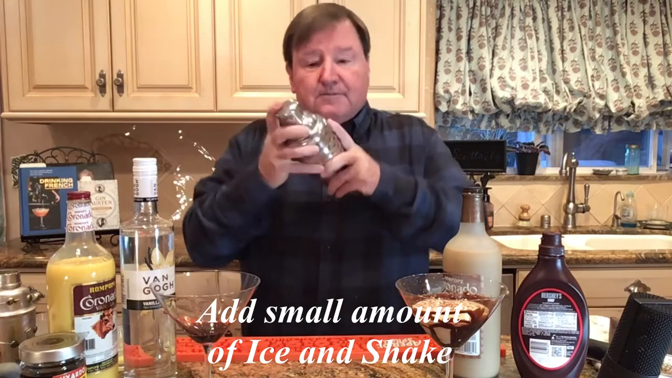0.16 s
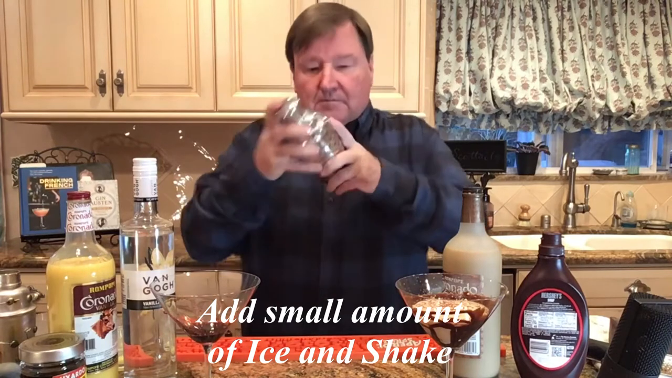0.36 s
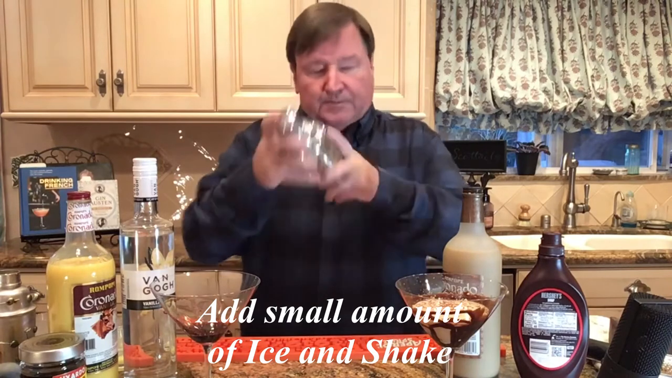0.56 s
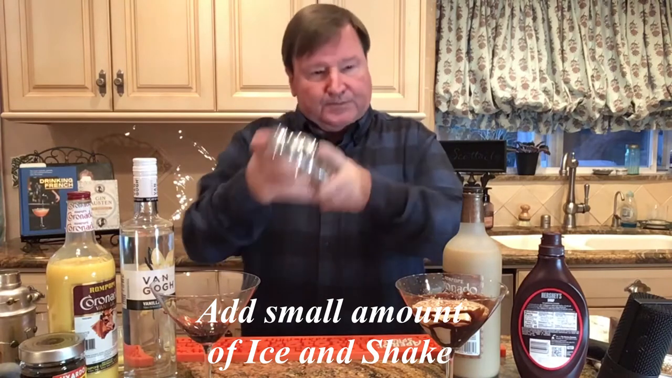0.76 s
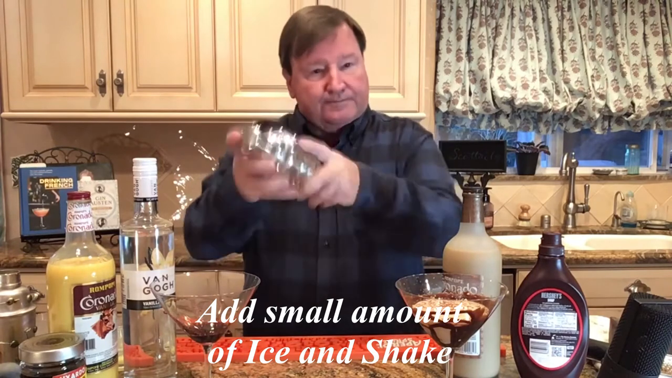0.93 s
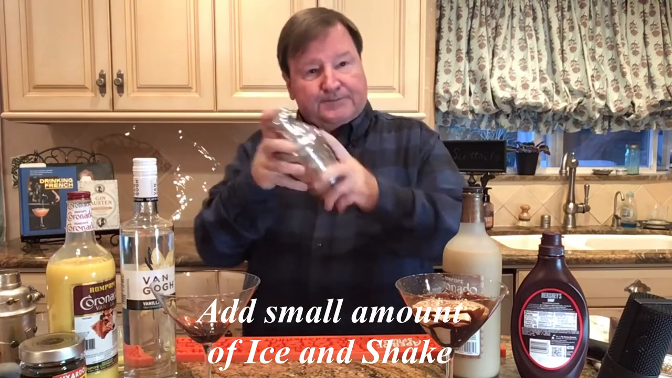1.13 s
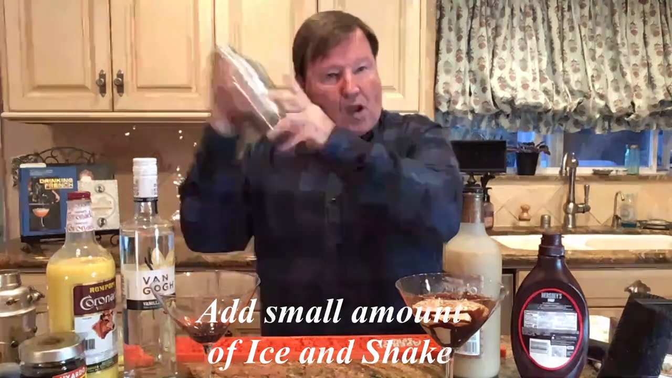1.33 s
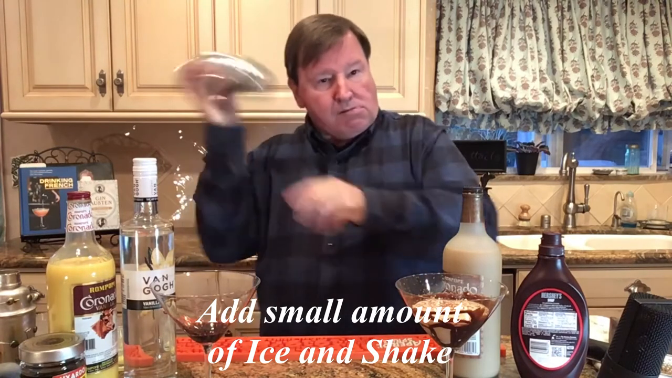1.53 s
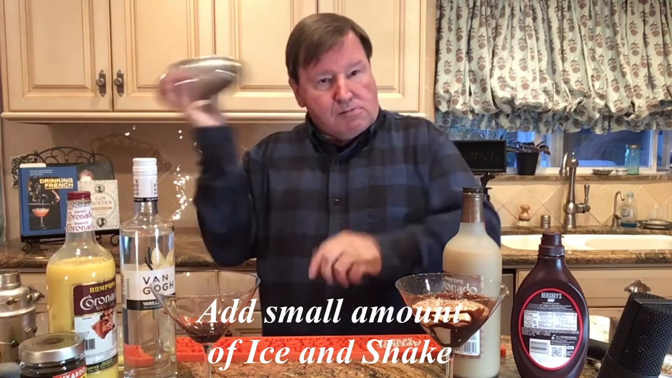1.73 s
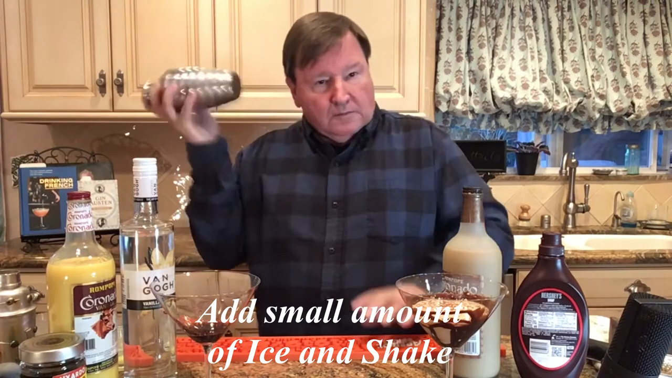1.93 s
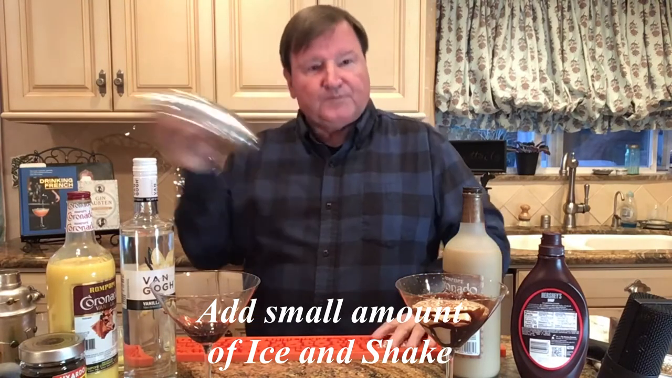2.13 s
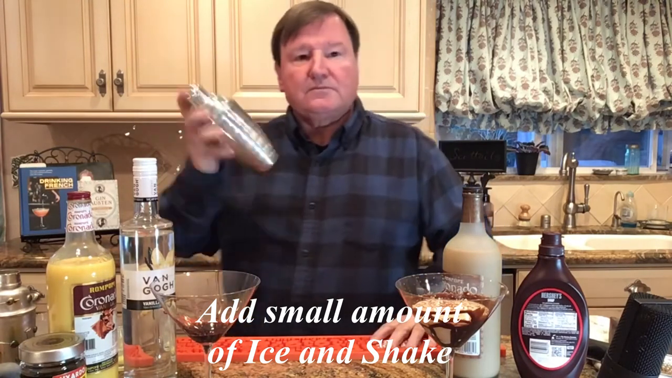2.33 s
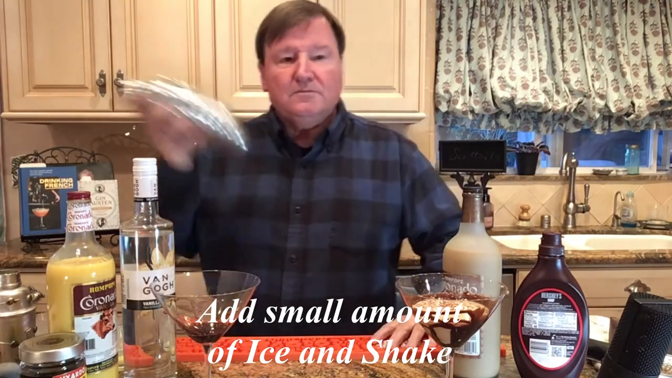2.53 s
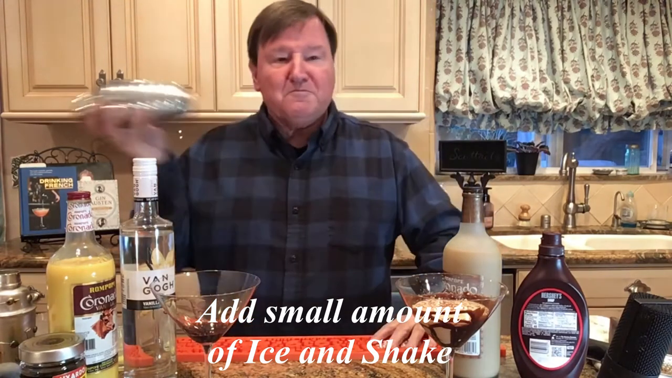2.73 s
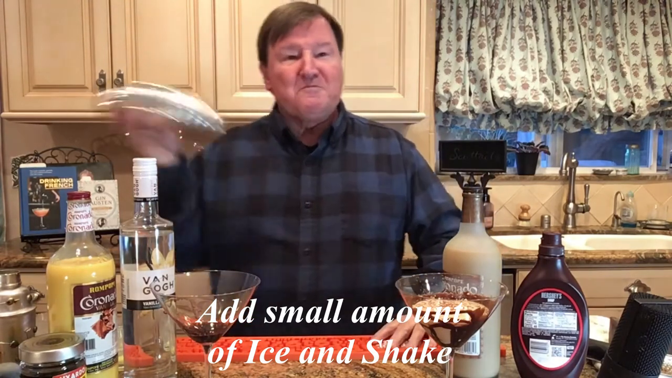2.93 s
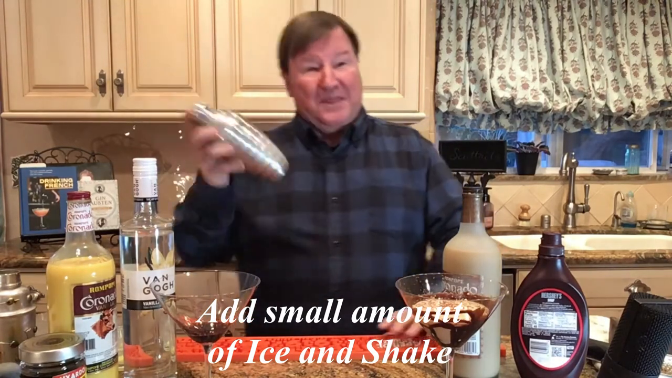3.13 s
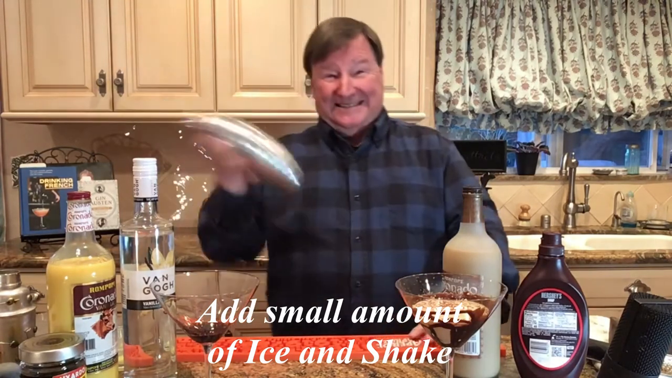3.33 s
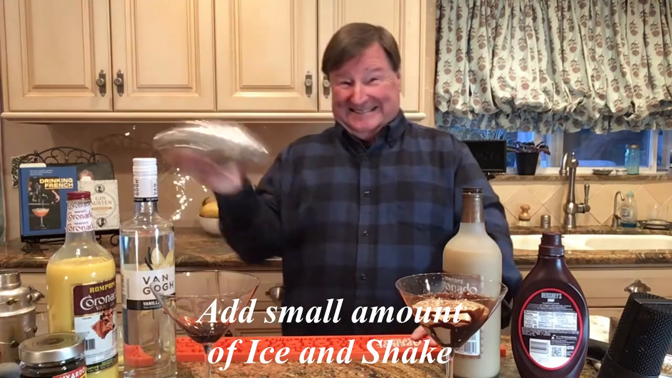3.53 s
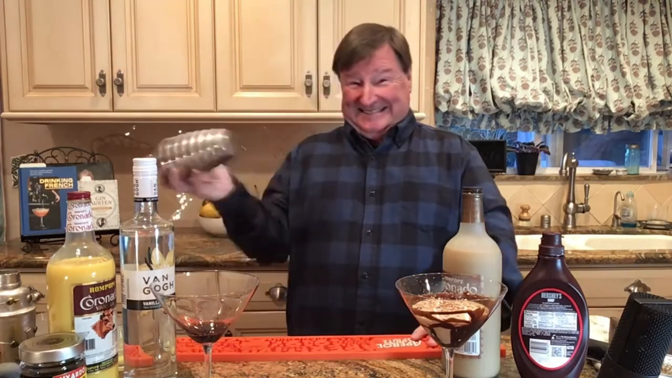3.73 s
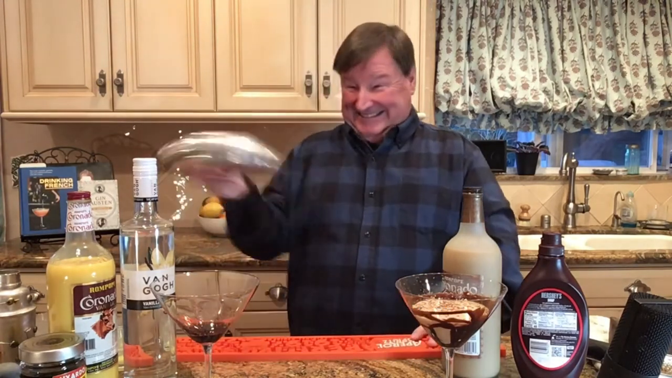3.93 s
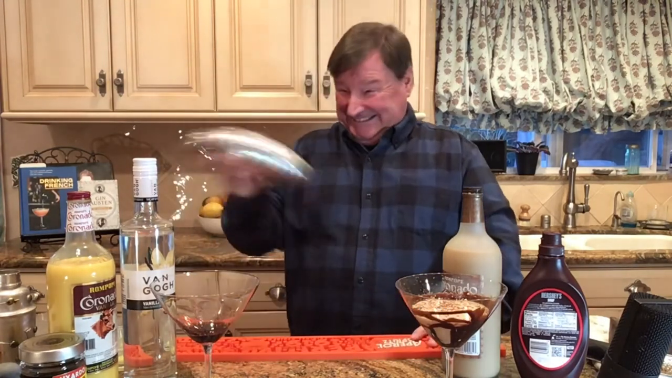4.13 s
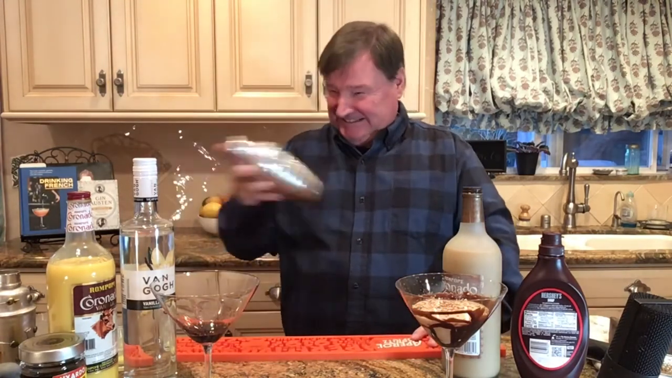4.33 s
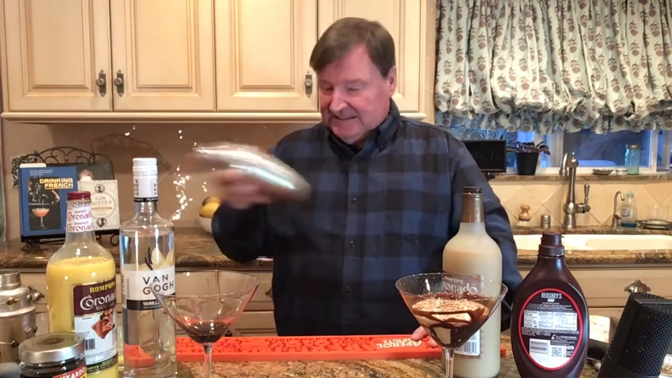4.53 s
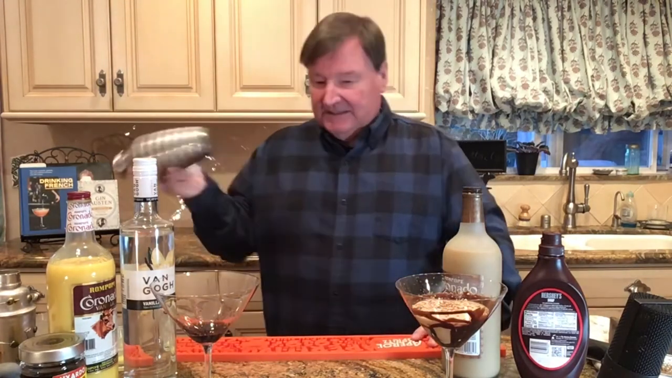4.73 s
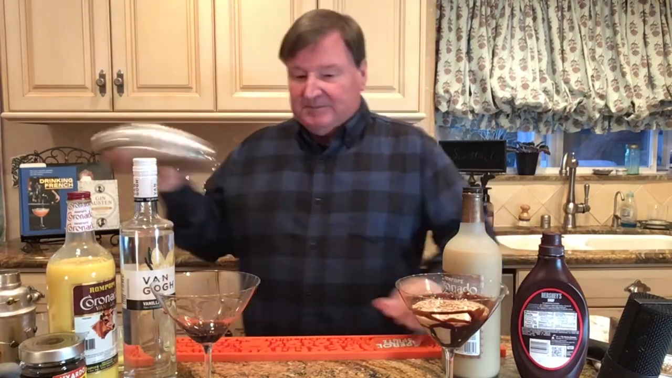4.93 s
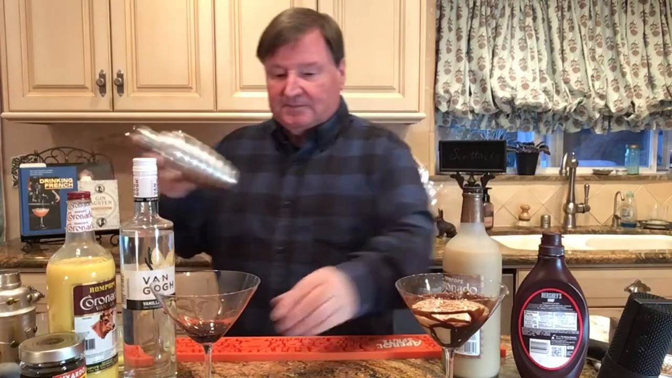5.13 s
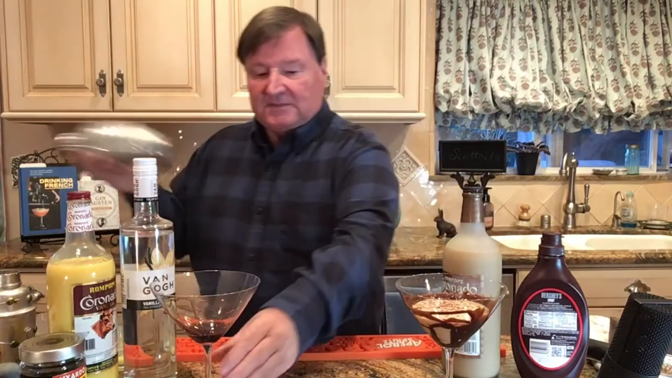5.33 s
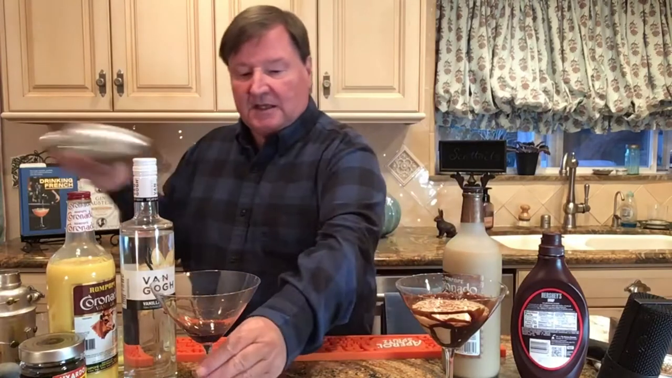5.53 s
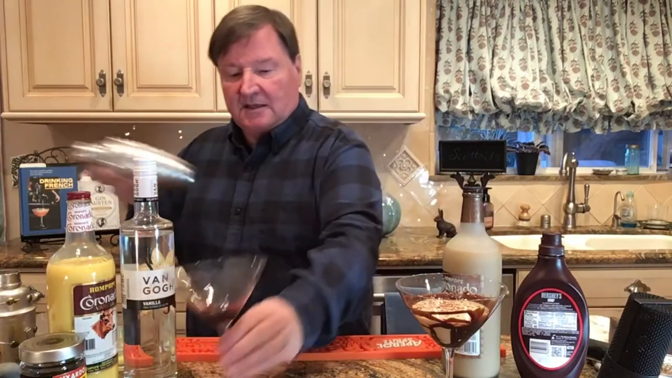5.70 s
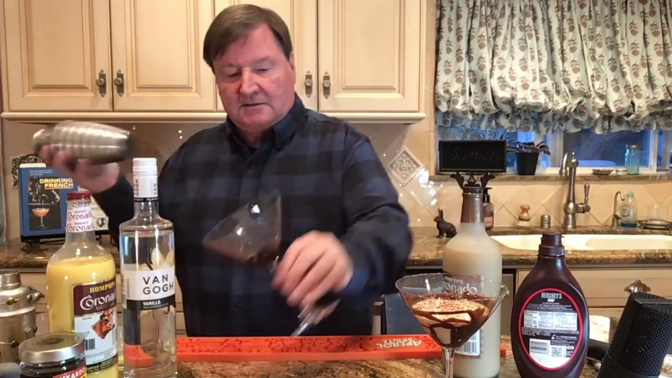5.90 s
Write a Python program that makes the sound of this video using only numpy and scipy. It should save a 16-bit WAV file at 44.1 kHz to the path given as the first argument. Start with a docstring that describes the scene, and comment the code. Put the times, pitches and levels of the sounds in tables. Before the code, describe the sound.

Vigorous shaking of ice and drink in a steel tin: fast, crunchy, dull-ringing rattles with one short gap early on, close in a home kitchen.

```python
"""Ice knocks hard on steel while ice and a creamy drink are shaken in a cocktail shaker in a kitchen.
Around each end of a stroke cubes knock (short thud, clack and tick), small chips rattle (filtered random
clicks) and the liquid slaps (duller clicks and low thuds), with a short pause to change grip.
The wet steel rings briefly (decaying, wavering tones) and two hands thump softly (a low decaying tone).
Cupboards and counter add a short bright echo (decaying noise) over room air and a faint mains hum."""
import sys
import numpy as np
from scipy import signal
from scipy.fft import rfft, irfft
from scipy.io import wavfile
from scipy.ndimage import uniform_filter1d

SR = 44100
rng = np.random.default_rng(int(sys.argv[2]) if len(sys.argv) > 2 else 0)


def store_wav(level_fs):
    """Save 16-bit WAV to argv[1]."""
    pcm = np.round(np.clip(np.atleast_2d(level_fs), -1, 1) * 32767)
    wavfile.write(sys.argv[1], SR, pcm.T.astype(np.int16))


N = 267422
TIME = np.arange(N) / SR  # seconds

# single knocks of a cube on the tin, from hard blows to faint ticks; levels are before the trims in cubes():
# start_s, hollow_thud_db, clack_db, bright_tick_db, clack_pitch_hz
KNOCKS = [(0.0285, -24, -18.5, -18, 2850), (.0848, -27.5, -23.5, -23, 2750), (0.1173, -45, -36, -16, 3850),
          (0.1461, -29, -19, -18, 2780), (.1605, -27, -21, -15, 3000), (.1686, -33, -12.5, -23, 3020),
          (.182, -24, -19, -18, 3830), (.196, -21, -17.5, -33, 2720), (0.3069, -13.5, -11, -19.5, 2600),
          (0.3762, -20, -18, -12, 2900), (0.3858, -20, -15, -14, 2750), (.419, -21, -12.5, -21, 2810),
          (.448, -36, -26, -20, 2900), (0.5, -23, -30, -18, 2940), (0.5058, -30, -23, -16.5, 2700),
          (.517, -18, -27, -19, 3050), (0.5415, -40, -12.5, -35, 3040), (.6046, -22, -27, -23, 3340),
          (.6212, -23, -18, -20, 2960), (.646, -18.5, -18.5, -23, 3150), (0.7195, -28, -23, -21, 3470),
          (0.7353, -18, -27, -30, 2450), (0.7474, -18.5, -22, -29, 2370), (0.7763, -23, -13.5, -23, 2700),
          (.793, -24, -16, -31, 3080), (.807, -43, -9.5, -37, 3050), (0.8497, -26, -14, -8, 4020),
          (.8564, -21, -15, -19, 3400), (.907, -26, -34, -19, 3580), (0.9313, -20, -14, -18, 3200),
          (.971, -17.5, -14, -25, 2400), (0.9934, -34, -14, -25, 2260), (1.041, -25, -14, -24, 2620),
          (1.0547, -43, -15.5, -16, 3170), (1.0734, -27, -18.5, -19, 3450), (1.1469, -22, -23, -21, 2680),
          (1.1792, -20, -18, -39, 2470), (1.185, -25, -24, -28, 2580), (1.22, -27, -19, -33, 4460),
          (1.269, -22, -45, -28, 2440), (1.3751, -39, -33.5, -38, 2500), (1.4548, -37, -31.5, -39, 2580),
          (1.5568, -47, -26, -23, 3600), (1.59, -40, -19.5, -23, 4000), (1.6566, -29, -15.5, -22, 3500),
          (1.674, -11, -14, -20, 2110), (1.8117, -28, -10, -22, 2870), (1.9054, -45, -25, -22, 3000),
          (1.9246, -30, -21, -24, 2980), (1.934, -19, -27, -19, 3560), (1.9928, -27, -18.5, -21, 2470),
          (2.0125, -33, -12.5, -27, 3600), (2.0466, -39, -12, -25, 2960), (2.1453, -37, -20, -18, 3000),
          (2.1587, -15, -13, -24, 3580), (2.1778, -20, -18, -20.5, 2550), (2.303, -27, -21, -38, 3650),
          (2.309, -22, -20, -27, 3030), (2.3832, -40, -25, -23, 2900), (2.4238, -38, -18, -24, 3040),
          (2.439, -38, -17, -30, 2980), (2.4432, -23, -19, -26, 2270), (2.515, -42, -12.5, -30, 3120),
          (2.572, -31, -16.5, -23, 3660), (2.6678, -30, -22, -16.5, 4400), (2.71, -19.5, -31, -22, 2750),
          (2.8162, -27, -19, -26, 3240), (2.8221, -38, -9, -37, 3070), (2.85, -36, -13, -22, 4480),
          (2.914, -27, -20, -20, 3580), (2.9394, -26, -10.5, -33, 3150), (2.9782, -26, -16, -32, 2940),
          (3.0895, -32, -17.5, -30, 3220), (3.19, -25, -21, -21, 3080), (3.2967, -41, -28.5, -43, 3040),
          (3.342, -54, -28, -27, 3080), (3.3888, -22, -11, -29, 3000), (3.453, -21.5, -18, -24, 3000),
          (3.4806, -37, -9.5, -18, 3260), (3.4976, -17, -13.5, -30, 3100), (3.5859, -22, -21, -25, 3070),
          (3.628, -24, -14.5, -25, 2980), (3.7082, -39, -18, -20, 3480), (3.737, -18, -21, -30, 3020),
          (3.861, -40, -15.5, -32, 3130), (3.8855, -28, -18, -35, 3530), (3.8934, -38, -24, -16, 3250),
          (3.9478, -20, -22, -20, 3170), (3.9777, -21.5, -21, -33, 3150), (4.0625, -29, -19, -20.5, 3050),
          (4.0741, -24, -21, -35, 2920), (4.1045, -47, -14, -33, 3100), (4.1432, -34, -25, -18, 3230),
          (4.1605, -28, -13, -33, 3060), (4.1834, -20, -42, -42, 2900), (4.198, -19, -18, -19, 3220),
          (4.2528, -25, -20.5, -22, 3240), (4.31, -46, -7.5, -20, 3200), (4.3261, -42, -12, -29, 2910),
          (4.343, -27, -12.5, -34, 3120), (4.383, -31, -18, -25, 3030), (4.4034, -19, -27, -24, 3000),
          (4.4282, -19, -29, -22, 2750), (4.5142, -25, -14.5, -22.5, 3000), (4.5283, -35, -15, -33, 2960),
          (4.551, -28, -26, -31, 3150), (4.5683, -32, -10.5, -38, 3800), (4.5756, -31, -10, -21, 3240),
          (4.6082, -26, -22, -15, 4050), (4.6596, -15, -36, -19.5, 2900), (4.794, -35, -19.5, -24.5, 3040),
          (4.8334, -32, -18, -30, 3340), (4.8587, -44, -14.5, -37, 3330), (4.8796, -39, -14.5, -26, 3150),
          (4.9133, -38, -21.5, -24, 2550), (5.088, -35, -31, -42, 3100), (5.1162, -41, -16, -39, 3320),
          (5.2044, -43, -21, -23, 3180), (5.3917, -44, -13.5, -23, 3130), (5.4868, -26, -24, -27.5, 3040),
          (5.643, -30, -30, -40, 2850), (5.698, -39, -20.5, -39, 3970)]
# tone colour of the hollow thud: pitch_hz, level_db
THUD_COLOUR = [(60, -36), (160, -21.5), (350, -11), (600, -4.5), (1000, -4), (1400, 9.5), (1900, 4.5),
               (2600, 1.5), (5000, -61)]
# tone colour of the bright tick: pitch_hz, level_db
TICK_COLOUR = [(2500, -18), (4200, 2), (5200, 3.5), (6500, -1), (8000, 2.5), (10500, 2.5), (13000, -0.5),
               (16000, -4)]


def cubes(thud_db=-2, clack_db=-2, tick_db=-1, clack_s=0.0011, thud_s=0.002, tick_s=0.0011,
          crunch_s=0.00046, crunch_db=-9, radiate_hz=240):
    """Each cube crunches on the steel for a moment and rings the hand-damped wall and the cavity."""
    out = np.zeros(N)
    t = TIME[:1024]
    span = 0.0035 * SR  # a part's level is its energy spread over 3.5 ms
    trims = (thud_db, clack_db, tick_db)
    for start_s, *levels, pitch_hz in KNOCKS + tumble():
        crunch, body, crack = rng.standard_normal((3, len(t)))
        # the contact is one click plus a very short crunch
        contact = undb(crunch_db) * crunch * np.exp(-t / crunch_s)
        contact[0] += 1
        wall_ring = np.exp(-t / clack_s) * np.cos(2 * np.pi * pitch_hz * t)
        clack = signal.fftconvolve(contact, wall_ring)[:len(t)]
        thud = colour(body * np.exp(-t / thud_s), THUD_COLOUR)
        tick = colour(crack * np.exp(-t / tick_s), TICK_COLOUR)
        for part, db, trim in zip((thud, clack, tick), levels, trims):
            gain = undb(db + trim) * np.sqrt(span / np.sum(part ** 2))
            add(out, start_s, part * gain)
    # a small tin radiates almost no bass
    return signal.sosfilt(signal.butter(2, radiate_hz, "highpass", fs=SR, output="sos"), out)


# more cubes tumble in around each crest: timing, level against the stroke, and random scatter
TUMBLE_LEAD_S, TUMBLE_SPREAD_S, TUMBLE_SCATTER_DB = 0.004, 0.034, 3
TUMBLE_THUD_DB, TUMBLE_CLACK_DB, TUMBLE_TICK_DB = -15, -5, -6
TUMBLE_HZ, TUMBLE_OCTAVES = 3140, 0.22


def tumble(count=3):
    """A few more cubes land one after another, harder in a harder stroke; rows as in KNOCKS."""
    rows = []
    for crest_s, db, bright_db, _ in STROKES:
        base = db + np.array([TUMBLE_THUD_DB, TUMBLE_CLACK_DB, TUMBLE_TICK_DB + bright_db])
        for k in range(count):
            turn = 2 * (k + rng.random()) / count - 1  # place in the stroke, from -1 to 1
            chance = rng.uniform(-1.07, 1, 4)
            levels = base + TUMBLE_SCATTER_DB * chance[1:]
            start_s = crest_s - TUMBLE_LEAD_S + TUMBLE_SPREAD_S * turn
            pitch_hz = TUMBLE_HZ * 2 ** (TUMBLE_OCTAVES * chance[0])
            rows.append((start_s, *levels, pitch_hz))
    return rows


# the load arriving at one end of the tin, also used by tumble() and liquid(); levels before trims:
# crest_s, rattle_db, brightness_db (treble against the rattle), liquid_db
STROKES = [(0.034, -22, -1.5, -46.5), (.163, -17.5, 1, -33.5), (0.306, -21, -4.5, -38),
           (.396, -17, -3.5, -35.5), (0.518, -15, -3.5, -33), (.628, -18, -1.5, -32.5),
           (0.728, -19.5, -6.5, -37.5), (.826, -17.5, -2.5, -34), (.965, -16.5, -6, -30.5),
           (1.047, -17.5, -2, -40), (1.153, -20, -3.5, -40), (1.236, -27, -12, -42), (1.33, -49, -4, -46),
           (1.461, -40.5, -5, -51), (1.605, -19.5, -3, -42), (1.678, -19, -3.5, -33.5),
           (1.816, -20, -3, -40), (1.933, -19.5, -4, -32), (2.042, -17, -8, -38), (2.163, -20.5, -3, -28),
           (2.324, -18, -5.5, -34), (2.439, -17, -4, -33.5), (2.592, -20.5, -6, -37.5),
           (2.677, -19.5, -1, -30.5), (2.84, -21.5, -7, -37), (2.946, -18.5, -4.5, -28.5),
           (3.106, -19, -5.5, -36.5), (3.214, -19.5, -5, -31.5), (3.405, -23.5, -4, -39.5),
           (3.49, -20.5, -7, -31), (3.625, -19.5, -8, -37), (3.705, -18, -4, -29), (3.854, -17, -5.5, -35),
           (3.948, -19.5, -4, -32), (4.1, -20, -9, -35), (4.17, -21, -6, -34.5), (4.325, -20, -5, -38),
           (4.405, -18, -5.5, -32.5), (4.573, -21.5, -6, -40), (4.651, -18.5, -6, -30),
           (4.861, -21, -3.5, -38), (4.953, -24.5, -5, -32.5), (5.129, -23, -6.5, -37),
           (5.238, -20, -7.5, -32), (5.418, -22, -3, -38), (5.509, -21, -7, -30.5),
           (5.725, -21.5, -6, -35.5), (5.867, -20, -5, -36), (6.026, -29.5, -7, -42.5)]
# tone colour of the small chips: pitch_hz, level_db
CHIPS_COLOUR = [(300, -38.5), (900, -29), (1350, -6), (2100, -6.5), (2650, -5.5), (3100, 2.5), (3600, -5.5),
                (4500, -5), (6300, -13.5), (8000, -7.5), (10500, -10.5), (13000, -14), (15500, -23.5)]
# every load of ice piles up and settles alike: times over 20 dB
ICE_RISE_S, ICE_FALL_S = 0.07, 0.12


def chips(level_db=-4.5, rate=720, scatter_db=3.5, bright_db=2):
    """Small ice rattles through every stroke; each stroke has its own brightness."""
    hail = clatter(rate, scatter_db, variety_db=10.5, even_s=0.043)
    rattle = unit(colour(hail, CHIPS_COLOUR))
    treble = signal.sosfiltfilt(signal.butter(2, 5200, "highpass", fs=SR, output="sos"), rattle)
    times, db, bright, _ = np.transpose(STROKES)
    body = surges(times, db, ICE_RISE_S, ICE_FALL_S)
    sparkle = surges(times, db + bright + bright_db, ICE_RISE_S, ICE_FALL_S)
    return undb(level_db) * ((rattle - treble) * body + treble * sparkle)


# tone colour of the splashing drink, also used by hammers(): pitch_hz, level_db
LIQUID_COLOUR = [(90, -20), (190, -10.5), (330, -6.5), (500, -0.5), (800, 1), (1150, 5), (1500, -4),
                 (2000, 1), (3000, 1.5), (6000, -22.5)]
# every load of liquid piles up and settles alike: times over 20 dB
LIQUID_RISE_S, LIQUID_FALL_S = 0.066, 0.11
# heavy splashes land just after the ice, light ones slightly before: shift of a middling one, and per dB
LIQUID_SHIFT_S, SHIFT_S_PER_DB = 0.0071, 0.002


def liquid(rate=450, scatter_db=5):
    """The drink slaps the end of the tin in a burst of dull splashes, later when it is heavier."""
    hail = clatter(rate, scatter_db, variety_db=11, even_s=0.03)
    splashes = unit(colour(hail, LIQUID_COLOUR))
    times, _, _, db = np.transpose(STROKES)
    shift = LIQUID_SHIFT_S + SHIFT_S_PER_DB * (db - np.median(db))
    return splashes * surges(times + shift, db, LIQUID_RISE_S, LIQUID_FALL_S)


# the whole slug of drink hammering into the end of the tin; level is the thud's peak before the bass cut:
# start_s, level_db, pitch_hz
HAMMERS = [(.85, -20, 594), (1.27, -20, 850), (1.588, -19.5, 554), (1.656, -24, 850), (1.808, -24, 510),
           (2.047, -16.5, 563), (2.16, -9, 910), (2.445, -15, 680), (2.575, -22, 626), (2.817, -24, 404),
           (3.24, -15, 945), (3.497, -12, 850), (3.735, -18, 835), (3.966, -18, 900), (4.254, -24, 970),
           (4.43, -22, 900), (4.66, -30, 950), (4.964, -18, 945), (5.257, -18.5, 766), (5.723, -19, 680)]


def hammers(decay_s=0.0026, spread=0.3, flank_db=-9, gush_db=-18, gush_s=0.0094):
    """The liquid stops dead and knocks the tin: a hollow, heavily damped thud with a short gush."""
    out = np.zeros(N)
    t = TIME[:2048]
    for start_s, db, hz in HAMMERS:
        thud = np.zeros(len(t))
        for k in (-1, 0, 1):  # the main note with a weaker one on either side
            thud += undb(flank_db * abs(k)) * np.sin(2 * np.pi * hz * (1 + k * spread) * t)
        thud *= np.exp(-t / decay_s)
        gush = unit(colour(rng.standard_normal(len(t)), LIQUID_COLOUR)) * np.exp(-t / gush_s)
        add(out, start_s, undb(db) * (thud / np.max(np.abs(thud)) + undb(gush_db) * gush))
    return signal.sosfilt(signal.butter(3, 280, "highpass", fs=SR, output="sos"), out)


# the steel ringing, and one bright ping of a cube at 0.117 s; level is before the trim and waver in steel(): #
# start_s, pitch_hz, level_db
RINGS = [(.002, 910, -28), (.002, 2080, -28), (.117, 7880, -22), (.028, 886, -30), (.149, 1740, -29.5),
         (.195, 1750, -32.5), (.518, 1426, -21), (.645, 1724, -26), (.712, 1647, -27), (0.93, 1615, -22),
         (1.15, 1536, -16.5), (1.21, 1520, -28), (1.232, 1460, -19.5), (1.588, 1740, -27.5),
         (1.808, 1767, -28.5), (2.05, 1780, -36), (2.332, 1745, -36), (2.576, 1767, -27),
         (2.821, 1795, -32), (3.108, 1780, -25.5), (3.389, 1760, -33), (3.627, 1750, -30),
         (3.851, 1764, -32.5), (4.104, 1780, -37), (4.85, 1760, -37), (5.392, 1730, -33),
         (5.494, 1740, -29), (5.697, 1728, -31.5), (5.742, 1722, -33), (6.012, 1720, -35)]
# rings near LONGEST_HZ last longest; lower and higher ones die sooner (t60: time to fall 60 dB)
LONGEST_HZ, NEARNESS_HZ, LONG_T60_S, SHORT_T60_S = 1770, 110, 0.33, 0.11


def steel(level_db=-2, waver_db=3.5, detune=0.008):
    """The tin rings; liquid sliding over the wall makes pitch and loudness waver."""
    out = np.zeros(N)
    t = TIME[:SR // 2]
    for start_s, hz, db in RINGS:
        nearness = np.exp(-((hz - LONGEST_HZ) / NEARNESS_HZ) ** 2)
        t60_s = SHORT_T60_S + (LONG_T60_S - SHORT_T60_S) * nearness
        phase = 2 * np.pi * np.cumsum(hz * (1 + detune * waver(len(t)))) / SR
        fade = np.exp(-np.log(1000) * t / t60_s)
        gain = undb(db + level_db + waver_db * waver(len(t))) * fade
        add(out, start_s, np.sqrt(2) * gain * np.sin(phase))
    return out


def shell(x, level_db=-22, hz=1385, t60_s=0.37, wander=0.0354):
    """The filled end of the tin hums on after every rattle; its pitch wanders as the drink slides about."""
    t = TIME[:SR // 2]
    turn = np.exp(2j * np.pi * np.cumsum(hz * (1 + wander * waver(N, rate=14))) / SR)
    # shift the wandering pitch down to zero, let it ring there, then shift it back up
    fade = np.exp(-np.log(1000) * t / t60_s)
    mode = turn * signal.oaconvolve(x / turn, fade)[:N]
    return undb(level_db) * np.std(x) * unit(mode.imag)


# the loaded shaker thumping against both palms; level is before the doubling in palms():
# start_s, level_db
THUMPS = [(0.15, -51), (0.39, -53), (0.61, -49), (0.845, -43), (1.04, -51)]


def palms(hz=65, decay_s=0.0072):
    """A soft low thump when both hands stop the shaker: a low tone that dies at once."""
    out = np.zeros(N)
    t = TIME[:SR // 4]
    for start_s, db in THUMPS:
        add(out, start_s, 2 * undb(db) * np.exp(-t / decay_s) * np.sin(2 * np.pi * hz * t))
    return out


def clatter(rate, scatter_db, variety_db, even_s, count=13):
    """A steady hail of tiny collisions, each with its own size and its own share in every half-octave band."""
    hit = rng.random(N) < rate / SR  # rate is collisions per second
    size = hit * undb(scatter_db * np.minimum(rng.exponential(size=N), 3))
    edges = np.geomspace(220, 17000, count + 1)  # Hz
    lowest = signal.butter(2, edges[0], fs=SR, output="sos")
    out = signal.sosfilt(lowest, size * rng.choice([-1, 1], N))
    for band in zip(edges, edges[1:]):
        share = rng.choice([-1, 1], N) * undb(variety_db * rng.uniform(-1, 1, N))
        out += signal.sosfilt(signal.butter(2, band, "bandpass", fs=SR, output="sos"), size * share)
    # even out the loudness of the hail over a short moment
    power = uniform_filter1d(out ** 2, int(even_s * SR))
    return unit(out / np.sqrt(power + 1e-9))


def surges(times, levels_db, rise_s, fall_s, curve=1.38):
    """Loudness of a load that piles up against the end of the tin and settles, once for each stroke."""
    power = np.zeros(N)
    lead_s = 0.25  # how long before the crest a surge begins
    for crest_s, db in zip(times, levels_db):
        start_s = max(crest_s - lead_s, 0)
        d = TIME[:SR] + start_s - crest_s  # seconds from the crest
        drop = np.where(d < 0, np.abs(d / rise_s) ** curve, d / fall_s)
        add(power, start_s, undb(db - 20 * drop) ** 2)
    return np.sqrt(power)


def waver(length, rate=45):
    """A random wobble with a spread near 1: straight lines between random points, rate points a second."""
    steps = np.arange(length) * rate / SR
    return np.interp(steps, np.arange(256), rng.standard_normal(256))


def kitchen(x, swing_hz=3.8, count=14):
    """The shaker swings through many places, each with its own echo."""
    place = TIME * swing_hz * count
    out = x.copy()
    for k in range(count):
        away = np.abs((place - k + count / 2) % count - count / 2)
        # neighbouring places blend into each other
        here = np.sqrt(np.maximum(1 - away, 0))
        out += signal.oaconvolve(x * here, reflections())[:N]
    return out


# tone colour of the kitchen's echo: pitch_hz, level_db
ECHO_COLOUR = [(80, -20), (400, -4.5), (1000, -3), (1400, 1.5), (2300, -3), (3100, 0.5), (4000, 0),
               (6000, 5.5), (10000, 5), (16000, 5)]


def reflections(wet_db=-4.0, t60_low=0.36, t60_high=0.13, gap_s=0.0013, early_db=3, early_s=0.01):
    """Dense early returns from counter and cupboards, then a short diffuse tail."""
    t = TIME[:SR // 2]
    noise = rng.standard_normal(len(t))
    low = signal.sosfilt(signal.butter(1, 4000, fs=SR, output="sos"), noise)
    low_tail = low * np.exp(-np.log(1000) * t / t60_low)
    high_tail = (noise - low) * np.exp(-np.log(1000) * t / t60_high)  # treble dies sooner
    onset = 1 - np.exp(-(t / gap_s) ** 2)
    early = undb(early_db * np.exp(-t / early_s))
    tail = colour((low_tail + high_tail) * onset * early, ECHO_COLOUR)
    return undb(wet_db) * tail / np.sqrt(np.sum(tail ** 2))


# tone colour of the still room air: pitch_hz, level_db
AIR_COLOUR = [(25, -5), (45, -4), (62, 14), (90, -4), (140, 1), (300, -6), (800, -10.5), (3000, -36),
              (15000, -43)]
AIR_DB, HUM_HZ, HUM_DB = -59, 119.7, -67


def background():
    """Still room air as filtered noise, and the hum of an appliance as one steady tone."""
    air = unit(colour(rng.standard_normal(N), AIR_COLOUR))
    hum = unit(np.sin(2 * np.pi * HUM_HZ * TIME))
    return undb(AIR_DB) * air + undb(HUM_DB) * hum


def undb(db):
    """Decibels to gain."""
    return 10 ** (np.asarray(db) / 20)


def unit(x):
    """Scale to an rms (average strength) of 1."""
    return x / np.sqrt(np.mean(x ** 2))


def add(out, start_s, sound):
    """Mix a sound in at a time."""
    start = max(int(start_s * SR), 0)
    out[start:start + len(sound)] += sound[:max(N - start, 0)]


def response(points, size=1024):
    """Turn a tone colour into a short filter that never sounds before its input (minimum phase)."""
    hz, db = np.transpose(points)
    grid_hz = np.arange(size // 2 + 1) * SR / size
    curve_db = np.interp(np.log(grid_hz + 1), np.log(hz), db)
    # folding the cepstrum forward in time packs the energy at the start
    cepstrum = irfft(np.log(undb(curve_db)))
    cepstrum[1:size // 2] *= 2
    cepstrum[size // 2 + 1:] = 0
    return irfft(np.exp(rfft(cepstrum)))


def colour(x, points):
    """Filter a sound by a tone colour."""
    return signal.fftconvolve(x, response(points))[:len(x)]


def scene(ring_room_db=-7):
    """The shaker in the kitchen; the steel's ring reaches the microphone mostly directly."""
    shaker = cubes() + chips() + liquid() + hammers() + palms()
    ring = steel() + shell(shaker)
    share = undb(ring_room_db)  # part of the ring that also feeds the echo
    return (kitchen(shaker + share * ring) + (1 - share) * ring + background())[None]


TOP_HZ = 15900


def record(dry):
    """The microphone rounds the highest peaks and the top is cut."""
    ceiling = 0.9
    rounded = ceiling * np.tanh(dry / ceiling)
    return signal.sosfilt(signal.ellip(10, 0.1, 80, TOP_HZ, fs=SR, output="sos"), rounded)


dry = scene()
out = record(dry)
store_wav(out)
```